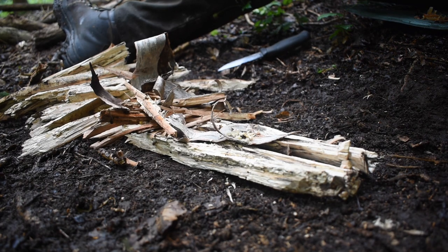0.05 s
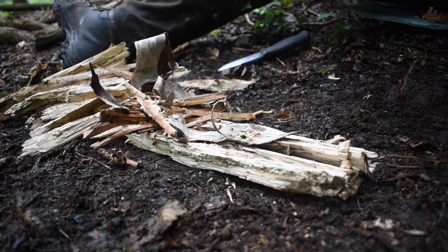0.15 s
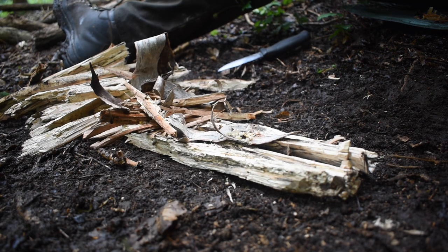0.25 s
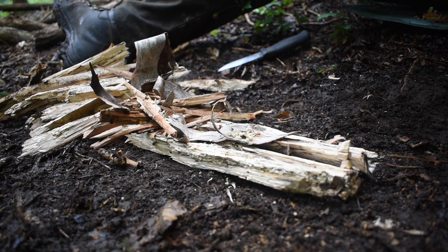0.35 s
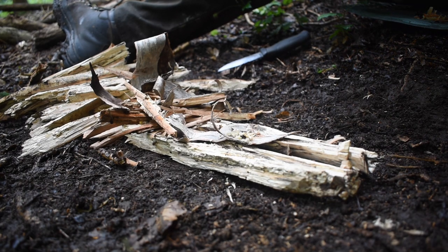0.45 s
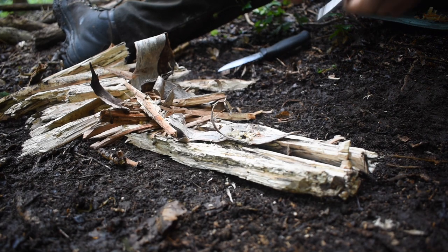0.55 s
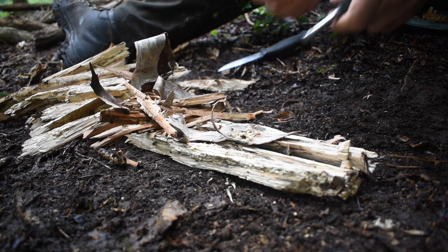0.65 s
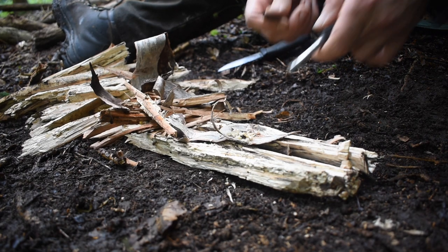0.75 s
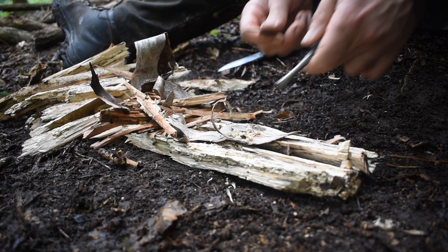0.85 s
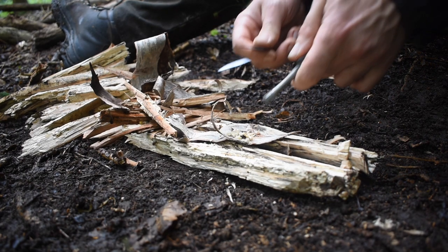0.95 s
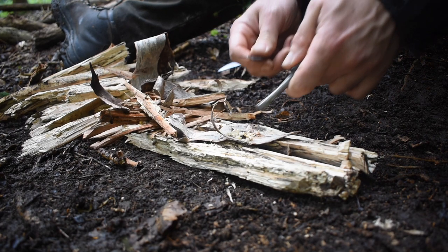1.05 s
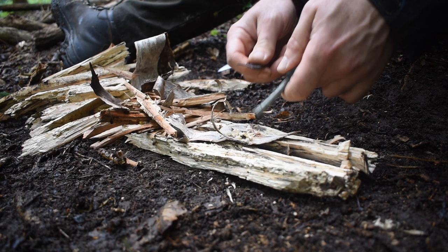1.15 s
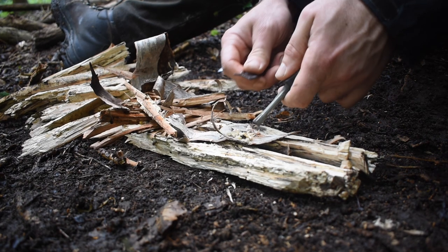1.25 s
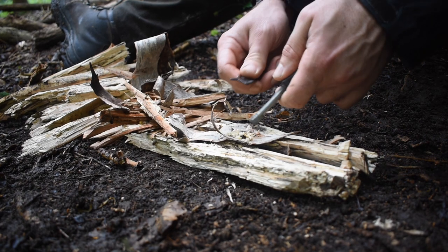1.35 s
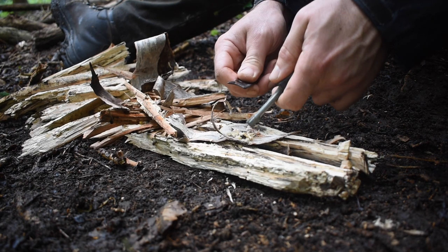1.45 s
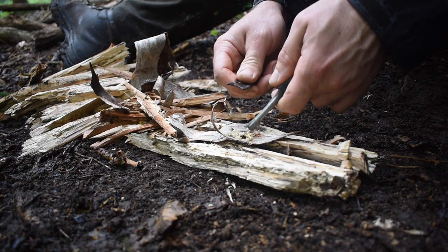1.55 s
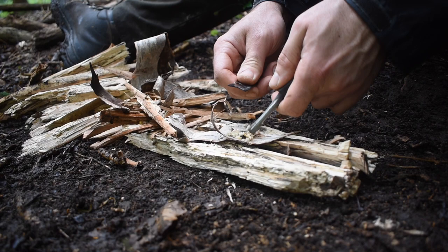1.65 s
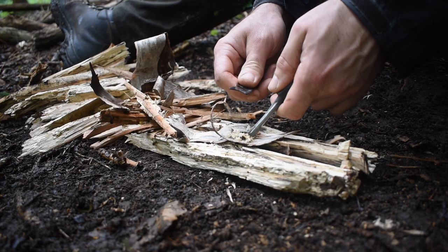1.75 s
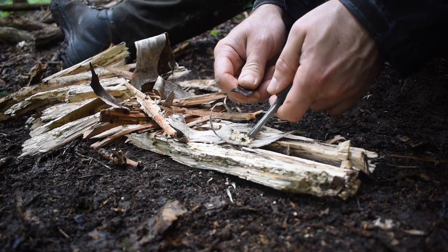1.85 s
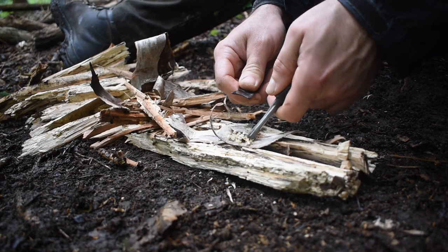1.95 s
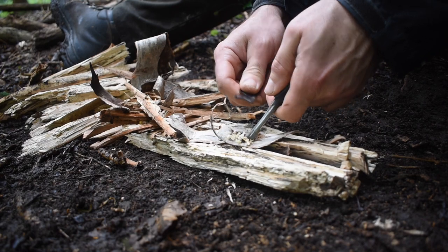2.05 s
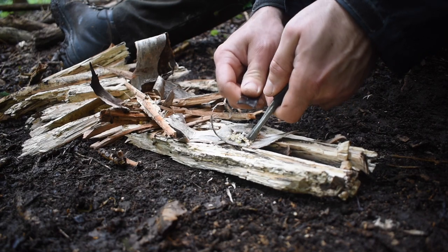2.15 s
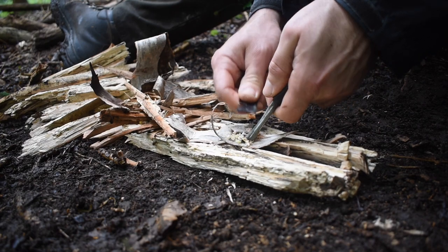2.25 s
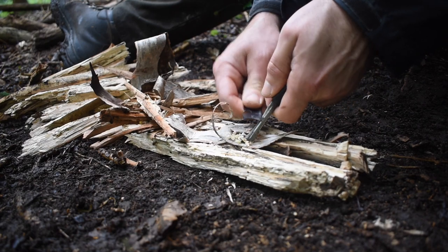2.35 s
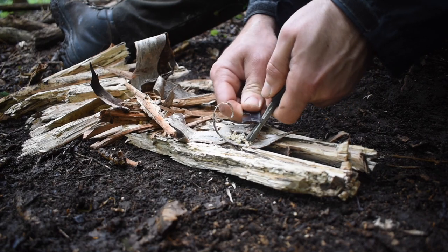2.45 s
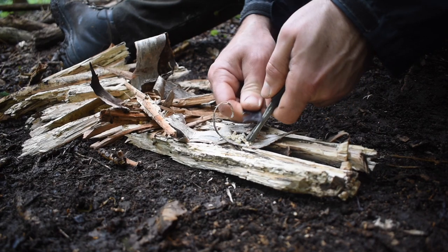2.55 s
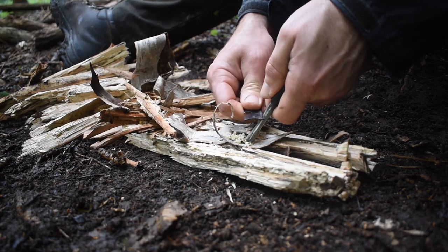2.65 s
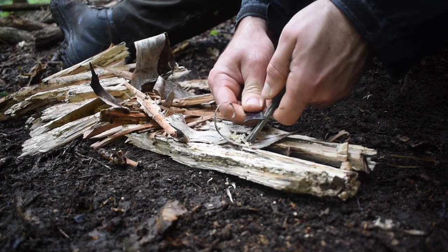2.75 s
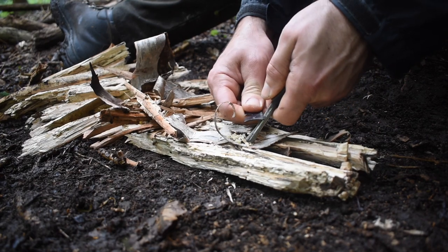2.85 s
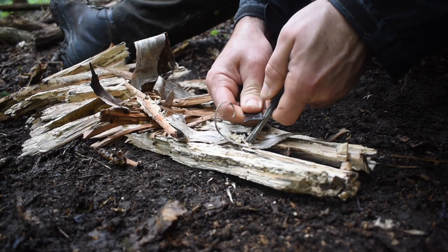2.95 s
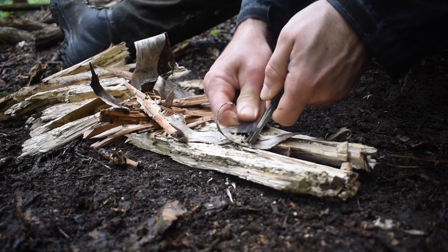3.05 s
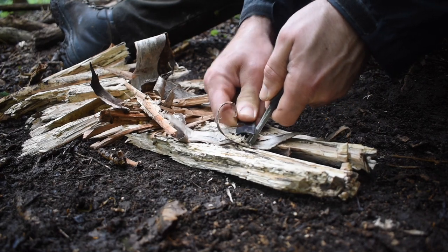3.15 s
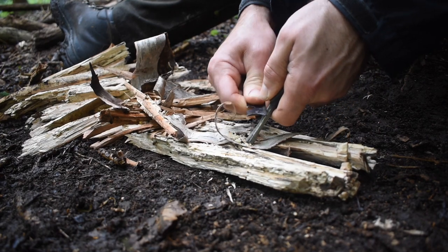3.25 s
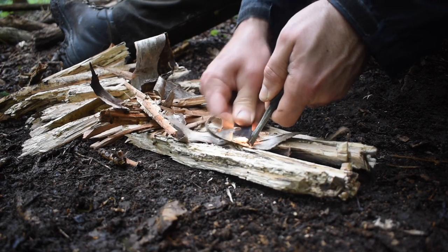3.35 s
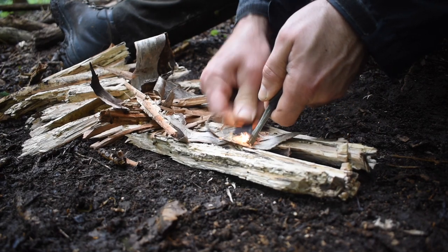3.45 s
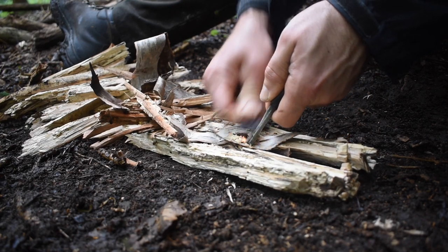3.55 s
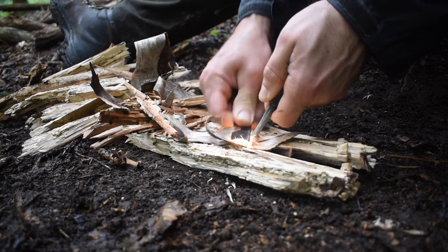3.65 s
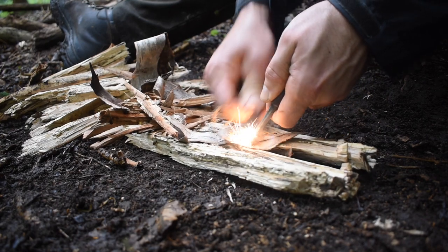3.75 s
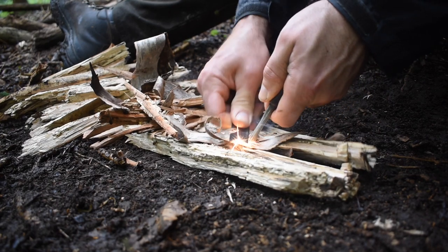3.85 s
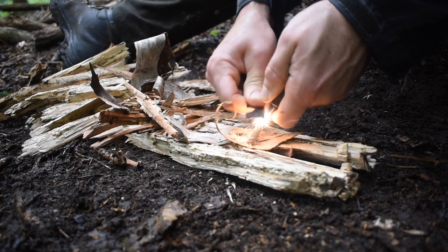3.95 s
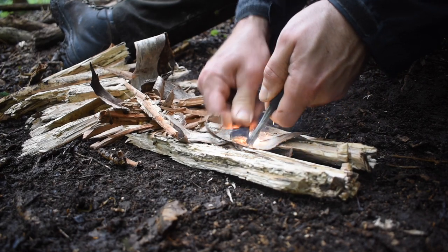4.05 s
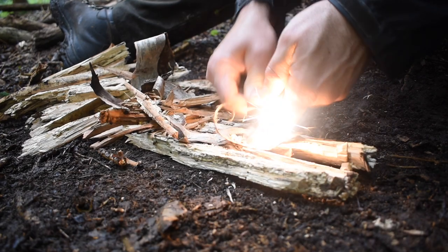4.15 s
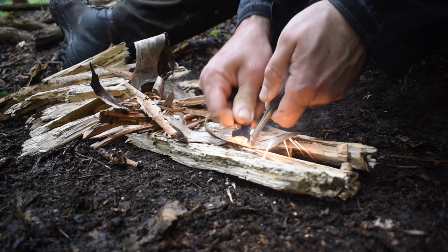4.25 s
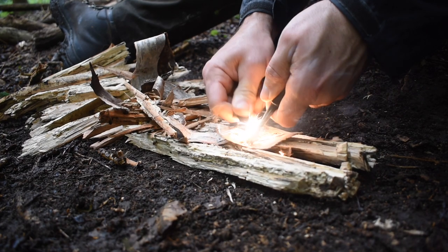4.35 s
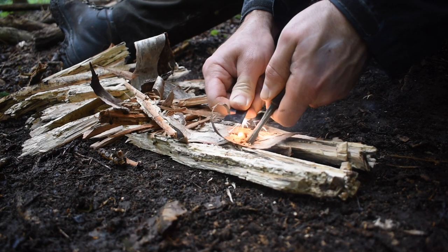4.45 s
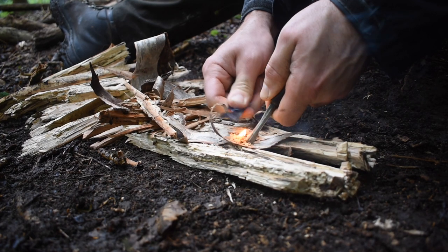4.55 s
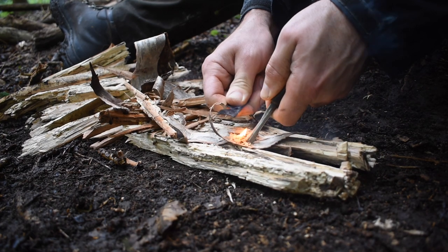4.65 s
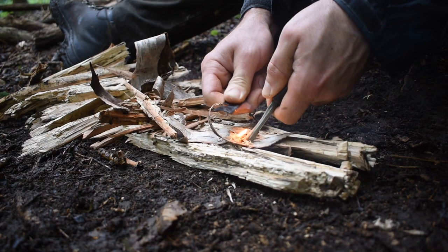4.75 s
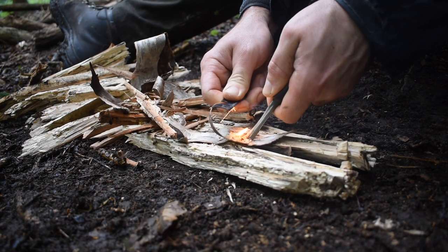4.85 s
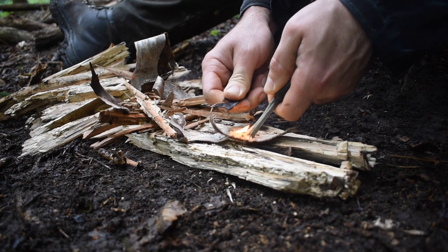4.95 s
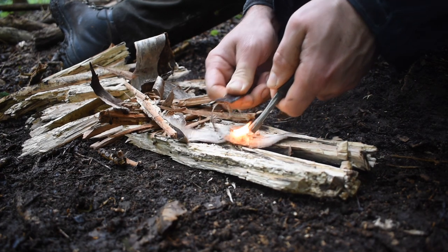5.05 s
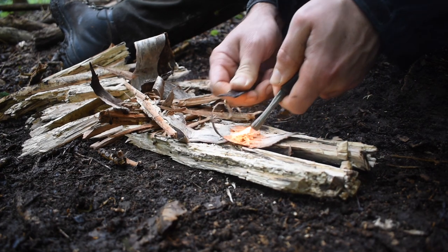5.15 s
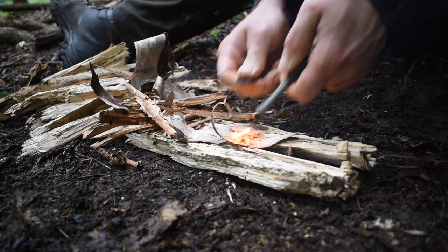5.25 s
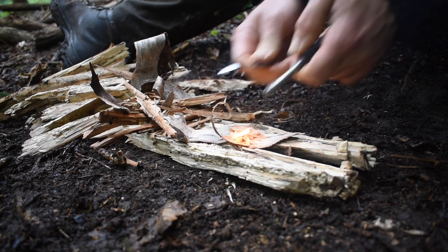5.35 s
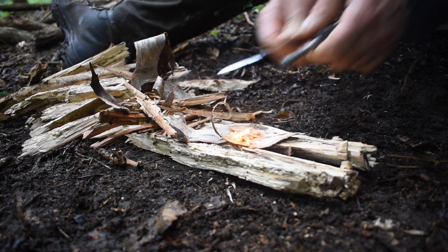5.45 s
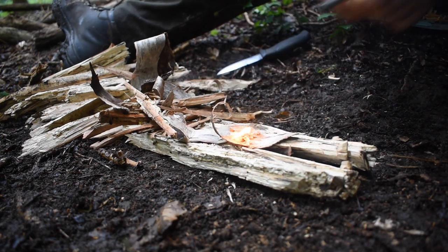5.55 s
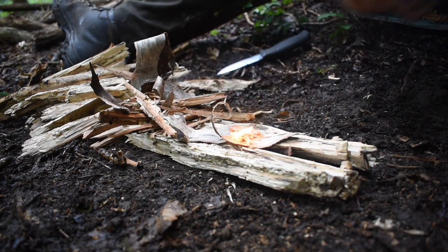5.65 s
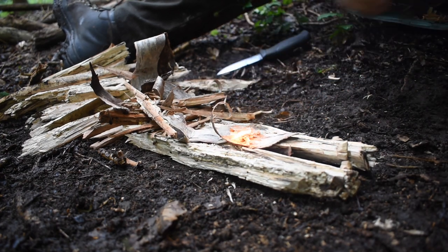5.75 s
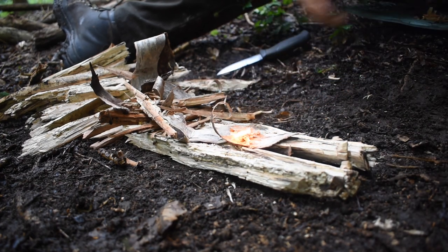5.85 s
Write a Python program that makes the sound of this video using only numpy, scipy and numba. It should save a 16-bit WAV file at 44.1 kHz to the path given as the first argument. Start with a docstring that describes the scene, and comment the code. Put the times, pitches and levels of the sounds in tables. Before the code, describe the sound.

Soft hush and faint birds, a knock on wood, then a rapid run of harsh metallic scrapes and snaps, ending with cloth rustle.

```python
"""A steel striker is scraped in quick strokes down a fire rod, its tip on split wood and bark, close to a camera
microphone in a woodland: uneven noise grains ring rod, striker and wood through moving band-passes.
Knocks are short pushes into wood and rod resonances; ticks and snags are brief noise bursts on the rod.
Sleeves rustle as the hands come and go (filtered grains), far birds whistle (narrow noise with an echo),
and a motor drones (a few sines) under the hush of the trees (shaped noise)."""
import sys
import numpy as np
from scipy import signal
from scipy.fft import rfft, irfft
from scipy.io import wavfile
from scipy.ndimage import uniform_filter1d
from numba import njit

SR = 44100
rng = np.random.default_rng(int(sys.argv[2]) if len(sys.argv) > 2 else 0)


def file_out(sig):
    """Save sig as 16-bit WAV at sys.argv[1]."""
    # one column per channel
    cols = np.atleast_2d(sig).T
    # limit, then scale
    lim = np.clip(cols, -1, 1)
    pcm = np.round(lim * 32767).astype(np.int16)
    wavfile.write(sys.argv[1], SR, pcm)


N = 261072

# resonances of the split wood under the rod tip: (centre [Hz], width [Hz], level [dB])
WOOD_MODES = [(970, 1210, 0), (1950, 460, -15), (260, 220, -13)]
# resonances of the fire rod, the lowest first: (centre [Hz], width [Hz], level [dB])
ROD_MODES = [(2320, 700, 2.5), (3400, 170, -11), (4640, 700, -15), (6370, 1350, 10.5), (7100, 700, 6),
             (8350, 420, 2)]


def undb(db):
    """Gain of a dB value."""
    return 10 ** (np.asarray(db) / 20)


def unit(x):
    """Scale to rms 1."""
    return x / np.sqrt(np.mean(x ** 2))


def unit_peak(x):
    """Scale to peak 1."""
    return x / np.abs(x).max()


@njit
def svf(x, hz, width):
    """State-variable band-pass, gain 1 at a centre that may move every sample."""
    y = np.empty(len(x))
    band_state, low_state = 0., 0.
    for i in range(len(x)):
        g = np.tan(np.pi * hz[i] / SR)
        damping = width / hz[i]
        v = (band_state + g * (x[i] - low_state)) / (1 + g * (g + damping))
        band_state = 2 * v - band_state
        low_state += 2 * g * v
        y[i] = damping * v
    return y


def band(x, hz, width):
    """Band-pass at a fixed or moving centre."""
    centre = np.clip(hz + np.zeros(len(x)), 20, 19000)
    return svf(x + 1e-18, centre, 1. * width)


def body(x, modes):
    """Sum of resonances with alternating sign."""
    return sum((-1) ** k * undb(db) * band(x, hz, width) for k, (hz, width, db) in enumerate(modes))


def column(table, index):
    """One column of a table as a curve over time."""
    rows = np.array(table)
    return np.interp(np.arange(N) / SR, rows[:, 0], rows[:, index])


def walk(rate):
    """Random levels held 1 / rate s and slewed twice; spread near 1."""
    hold = int(SR / rate)
    steps = np.repeat(rng.standard_normal(N // hold + 1), hold)
    slewed = uniform_filter1d(uniform_filter1d(steps, hold), hold)
    return 1.3 * slewed[:N]


def coloured(x, spectrum):
    """Shape a steady sound by (Hz, dB) points, then scale to rms 1."""
    hz, db = np.transpose(spectrum)
    f = np.arange(1, N // 2 + 2) * SR / N
    gain = undb(np.interp(np.log(f), np.log(hz), db))
    return unit(irfft(rfft(x) * gain, N))


def grit(spread_db, chatter_db, rate, count):
    """Dense micro-impacts of very uneven size, in bunches; count independent noises share the sizes."""
    size = undb(spread_db * rng.exponential(size=N) + chatter_db * walk(rate))
    return size * rng.standard_normal((count, N))


def add(out, s, x):
    """Mix a short sound in at time s."""
    i = int(s * SR)
    out[i:i + len(x)] += x[:N - i]


def shaded(x):
    """Hands and log hide the top of the handwork from the microphone, and small parts radiate no bass."""
    x = signal.sosfilt(signal.butter(3, 8600, fs=SR, output="sos"), x)
    return signal.sosfilt(signal.butter(2, 260, "high", fs=SR, output="sos"), x)


def trees():
    """Distant leaves and air: a smooth hush that swells a little."""
    # hush spectrum: (frequency [Hz], relative level [dB])
    hush_spectrum = [(15, -50), (25, -4), (48, -17.5), (101, -8), (140, -6), (199, -6.5), (246, -1.5),
                     (340, -0.5), (434, 1.5), (1540, 1), (1860, -0.5), (4760, -7), (6580, -15), (8160, -15),
                     (15600, -24.5)]
    level_db, swell_db, swells_per_s = -67.5, .6, 2.3
    swelling = undb(level_db + swell_db * walk(swells_per_s))
    return swelling * coloured(rng.standard_normal(N), hush_spectrum)


def engine():
    """A few thin low lines of a distant motor, fading in and out on the air."""
    # the far motor: (time [s], firing rate [Hz], level [dB])
    motor_course = [(.8, 49.5, -94), (1.8, 51, -87.5), (2.8, 53.2, -83.5), (3.5, 53.57, -98),
                    (4.6, 47.9, -85), (5.2, 49.7, -81.5), (5.9, 50.16, -84.5)]
    # its audible lines: (multiple of the firing rate, relative level [dB])
    motor_orders = [(3, -4.5), (4, -2.5), (5, -3.5), (10, 1.5), (11, -19)]
    phase = 2 * np.pi * np.cumsum(column(motor_course, index=1)) / SR
    lines = sum(undb(db + 2.3 * walk(2.88)) * np.sin(int(k) * phase) for k, db in motor_orders)
    return undb(column(motor_course, index=2)) * lines


def birds():
    """Far whistles arrive by many paths between the trunks, so each is a blurred, fluttering line."""
    # whistled notes: (start [s], length [s], first pitch [Hz], last pitch [Hz], level before fade and echo [dB])
    notes = [(0.284, .1, 1680, 1640, -71.5), (0.462, 0.12, 2950, 2850, -69.5),
             (0.554, 0.1, 2160, 1990, -66), (0.687, .05, 1940, 2110, -71), (0.727, 0.11, 2120, 2140, -71),
             (0.813, 0.08, 1986, 2300, -61), (0.906, 0.25, 2304, 2300, -67.5), (1.13, .27, 1755, 1740, -75),
             (1.27, 0.11, 2200, 2300, -74), (1.45, 0.089, 2240, 2200, -77), (1.43, 0.15, 4380, 4450, -79),
             (2.521, .2, 3550, 3760, -76), (4.6, .3, 1560, 1570, -74.5), (4.611, 0.29, 2280, 2350, -72),
             (4.646, 0.26, 1880, 1880, -78), (5.13, 0.085, 2530, 2500, -66),
             (5.151, 0.089, 2880, 2930, -66.5), (5.293, 0.24, 2914, 2940, -68.5),
             (5.32, .1, 2470, 2570, -64)]
    fade_db_per_s, echo_db, waver = 17, -1.5, .012  # waver is a fraction of the pitch
    out = np.zeros(N)
    for s, length, first_hz, last_hz, db in notes:
        t = np.arange(int(length * SR)) / SR
        glide_hz = first_hz + (last_hz - first_hz) * t / length
        hz = glide_hz * (1 + waver * walk(22.5)[:len(t)])
        noise = rng.standard_normal(N // 10)[:len(t)]
        blur = unit(band(band(noise, hz, 60), hz, 140))
        add(out, s, blur * undb(db - fade_db_per_s * t) * signal.windows.tukey(len(t), .25))
    t = np.arange(12000) / SR
    trunks = rng.standard_normal(len(t)) * np.exp(-t / 0.24)
    echo = signal.fftconvolve(out, trunks / np.linalg.norm(trunks))[:N]
    return out + undb(echo_db) * echo


def sleeves():
    """Stiff cloth rubbing: fine grain up high, a hollow swish from the folds."""
    # hands reach in, settle and draw back: (time [s], rustle level [dB], swish level [dB], swish centre [Hz])
    cloth_course = [(0.0, -66.5, -69, 1670), (0.2, -67.5, -70, 1870), (0.5, -63, -72, 1750),
                    (0.76, -63, -71.5, 1920), (0.88, -71.5, -70, 2010), (1.26, -74.5, -69, 1860),
                    (1.55, -74.5, -79, 1950), (1.9, -73.5, -70, 1860), (2.2, -71.5, -86, 1670),
                    (2.5, -72.5, -68.5, 1490), (2.75, -75, -88.5, 1370), (4.4, -72, -85, 1690),
                    (4.55, -74.5, -80, 1700), (5.18, -71, -72, 1650), (5.31, -67, -77, 1540),
                    (5.5, -63.5, -68.5, 1690), (5.6, -57.5, -69, 1590), (5.69, -57, -56.5, 1560),
                    (5.79, -53.5, -54.5, 1800), (5.92, -54.5, -63.5, 1720)]
    # rustle spectrum: (frequency [Hz], relative level [dB])
    cloth_spectrum = [(1470, -62), (2500, -4.5), (2880, -1.5), (4040, 0.5), (5300, 1.5), (6500, 3),
                      (7200, 0), (8680, -7.5), (15000, -33.5)]
    rub, fold = grit(1.6, 1.13, 60, count=2)
    swish_hz = column(cloth_course, index=3) * (1 + 0.047 * walk(20))
    swish = unit(band(band(fold, swish_hz, 680), swish_hz, 1900))
    rustle = coloured(rub, cloth_spectrum)
    return undb(column(cloth_course, index=1)) * rustle + undb(column(cloth_course, index=2)) * swish


def ticks():
    """A burst of about a millisecond in a broad resonance, with a short noisy ring of the rod."""
    # striker edge touching or snagging on the rod, tinder crackling; levels before shading:
    # (time [s], tick peak [dB], tick centre [Hz], rod ring relative to the tick [dB])
    touches = [(1.812, -46, 6300, -5), (2.3455, -44, 6420, -6), (2.391, -22, 6240, -5.5),
               (2.4674, -57, 4450, -11), (2.6574, -57, 3870, 5), (2.714, -38.5, 7100, -22),
               (2.863, -47.5, 7200, -11), (2.868, -53, 4500, -13), (2.928, -52.5, 6720, -14),
               (2.9867, -44.5, 4230, -15), (3.019, -47, 4900, -6), (3.217, -40, 5620, -10),
               (3.4082, -27.5, 7060, -17), (3.447, -30.5, 7360, -18), (3.4917, -24.5, 5370, -8),
               (3.5258, -30, 5850, -26), (3.5813, -34, 6000, -20), (3.622, -27, 7050, -11),
               (3.7416, -27, 5600, -24), (3.754, -27, 6830, -13), (3.7684, -39, 6840, -10),
               (3.9168, -26, 5000, -18), (3.937, -22.5, 7050, -34), (4.0015, -27, 7200, -11),
               (4.035, -24, 4770, -18), (4.12, -26, 4790, -3), (4.1412, -18.5, 6800, -3),
               (4.1633, -26, 6600, -16), (4.1792, -19.5, 6200, -32), (4.187, -21.5, 6320, -16),
               (4.2409, -21, 7300, -27), (4.2463, -18.5, 6000, -4), (4.2851, -32.5, 3350, -11),
               (4.3022, -34, 7380, -24), (4.313, -33, 6860, -16), (4.3312, -34, 3360, -14),
               (4.36, -26, 3970, -35), (4.3826, -24, 6950, -12), (4.4019, -38, 7040, -14),
               (4.4174, -46, 4020, -22), (4.4697, -39, 6350, -8), (4.4878, -35, 6290, -8),
               (4.5012, -29.5, 8700, -22), (4.5124, -45, 8350, -18), (4.568, -40, 7900, -16),
               (4.607, -48.5, 3460, -8), (4.707, -47, 6710, -7), (4.7938, -49, 3680, -16),
               (4.875, -40.5, 8200, -8), (4.89, -45, 6630, -14), (5.0546, -46, 6250, -13),
               (5.438, -46, 3570, -16), (5.556, -24.5, 6200, -2), (5.5776, -37.5, 5460, -15)]
    out, t = np.zeros(N), np.arange(3000) / SR
    for s, db, hz, ring_db in touches:
        noise = rng.standard_normal(len(t))
        burst = noise * np.exp(-t / 0.0013)
        tick = band(band(burst, hz, .5 * hz), hz, 0.49 * hz)
        tick = tick + undb(-2.5) * band(burst, 6570, 7200)
        ring = body(noise * np.exp(-t / 0.004), ROD_MODES)
        add(out, s, undb(db) * (unit_peak(tick) + undb(ring_db) * unit_peak(ring)))
    return shaded(out)


def knocks():
    """A short push rings the wood with a splinter rattle, and the rod cracks along with it."""
    # rod tip or knuckles on the wood, before shading:
    # (time [s], thud peak [dB], rod crack relative to the thud [dB])
    hits = [(0.784, -49, -2), (1.1, -50.5, -12), (1.6445, -22, -6), (2.177, -53, -15), (2.4108, -41.5, 1),
            (2.487, -47, 0.5), (2.51, -51, 4), (2.684, -54, -14), (2.794, -54, 5), (3.1125, -32, -27),
            (3.856, -30.5, -2), (4.832, -50, 2), (5.2636, -21.5, -10.5), (5.2693, -36, -17),
            (5.411, -38, -6), (5.722, -42.5, 0)]
    out, t = np.zeros(N), np.arange(4000) / SR
    push = -np.exp(-t / .0001)
    for s, db, bright_db in hits:
        rattle, crackle = rng.standard_normal((2, len(t)))
        thud = body(push + undb(-16.0) * rattle * np.exp(-t / 0.0069), WOOD_MODES)
        crack = body(push + undb(-22) * crackle * np.exp(-t / 0.01), ROD_MODES)
        add(out, s, undb(db) * (unit_peak(thud) + undb(bright_db) * unit_peak(crack)))
    return shaded(out)


def strokes():
    """Pressure of each stroke (rise, contact, lift-off) passed to rod, wood, striker and sparks, and the rod's ring."""
    # one row a stroke, levels before shading, ring and wood and striker shares at mid-contact:
    # (start [s], rise [s], contact [s], level after the rise [dB], level at lift-off [dB],
    # ring of the free rod [Hz], wood share [dB], striker share [dB], spark fizz share [dB])
    stroke_rows = [(2.577, .014, 0.031, -65, -64, 5840, 0.5, -18, -33),
                   (3.031, 0.058, 0.06, -42.5, -45.5, 6100, -7.5, -4.5, -26),
                   (3.104, 0.01, 0.01, -40, -55.5, 6240, 0, 3.5, -34),
                   (3.17, 0.018, 0.019, -51.5, -55.5, 5240, -8, -15, -30),
                   (3.212, 0.0094, 0.048, -51.5, -44, 5600, -7.5, -16, -42),
                   (3.282, .01, 0.011, -46, -50.5, 6300, -9, -10, -32),
                   (3.322, 0.02, 0.063, -44.5, -38.5, 5840, -10.5, -5, -16),
                   (3.401, 0.0047, 0.049, -42.5, -46.5, 6950, -3, -3, -24),
                   (3.46, 0.022, 0.066, -42.5, -48.5, 5600, -7, -31, -19),
                   (3.546, 0.066, 0.091, -42.5, -33.5, 6460, -8.5, -4.5, -19),
                   (3.64, 0.011, 0.075, -44.5, -50.5, 6750, -5.5, -8.5, -21),
                   (3.704, 0.014, 0.043, -42.5, -41, 5900, -3.5, -7.5, -23),
                   (3.755, .012, 0.034, -50.5, -48, 6800, -0.5, -8, -10),
                   (3.789, 0.014, .068, -42.5, -35, 6250, -7.5, -5, -17),
                   (3.863, 0.017, 0.036, -50, -51.5, 6860, -4, -20, -20),
                   (3.908, 0.011, 0.077, -37.5, -47, 6300, -5, -10, -19),
                   (3.99, 0.031, 0.085, -37.5, -38, 6740, -5.5, -5, -20),
                   (4.107, 0.01, 0.083, -39.5, -36.5, 5730, -6, -17, -30),
                   (4.195, 0.0098, .058, -43, -35, 6740, -7, -5, -18),
                   (4.267, 0.039, 0.073, -46.5, -55, 6900, -2, -7, -16),
                   (4.34, 0.016, 0.075, -45.5, -47, 7050, -2.5, -4.5, -23),
                   (4.427, .01, 0.094, -58, -59.5, 6600, -2.5, -26, -15.5)]
    lift_s = 0.033  # the edge comes off the rod
    climb_hz_per_s = 4300  # the free rod shortens as the edge travels, so its ring climbs
    # nearer the tip the wood speaks more, the striker less
    wood_gain_db_per_s, striker_fade_db_per_s = 19, 29
    # a tiny floor keeps the ring at 6000 Hz between strokes
    power, weighted_hz = np.full((4, N), 1e-18), np.full(N, 6e-15)
    for s, rise, contact, top_db, end_db, hz, wood_db, striker_db, fizz_db in stroke_rows:
        t = np.arange(int((contact + lift_s) * SR)) / SR
        # squared ramps up and down, with a hold between them
        grip = np.clip(np.minimum(t / rise, (contact + lift_s - t) / lift_s), 0, 1) ** 2
        level = grip * undb(np.interp(t, [min(rise, contact), contact], [top_db, end_db]))
        along = t - contact / 2  # seconds from mid-contact
        wood_share = wood_db + wood_gain_db_per_s * along
        striker_share = striker_db - striker_fade_db_per_s * along
        for row, db in zip(power, [0 * t, wood_share, striker_share, fizz_db + 0 * t]):
            add(row, s, (level * undb(db)) ** 2)
        add(weighted_hz, s, level ** 2 * (hz + climb_hz_per_s * along))
    # where strokes overlap, the stronger one pulls the ring towards its pitch
    return (*np.sqrt(power), weighted_hz / power[0])


def scraping():
    """Grit torn off the rod rings its free length, the striker plate and the wood; sparks fizz on top."""
    log_hz, striker_hz = 320, 4600
    rod_gain, wood_gain, striker_gain, fizz_gain, ring_hz = strokes()
    # the edge chatters, so the grit comes in bunches
    on_rod, on_edge, on_plate, on_wood = grit(2.92, 2.07, 260, count=4)
    ring = band(on_rod, ring_hz * (1 + 0.064 * walk(40)), 1300)
    ring = unit(band(ring, ring_hz, 6900))
    broad = undb(-3) * unit(band(on_edge, 6700, 5000))
    # the thumb shifts on the plate and detunes it
    plate_hz = striker_hz * (1 + 0.12 * walk(25.11))
    striker = unit(band(band(on_plate, plate_hz, 850), striker_hz, 2200))
    wood = unit(band(on_wood, 2260, 2900)) + undb(-16.5) * unit(body(on_wood, WOOD_MODES))
    sparks = grit(2.9, 7.1, 70, count=1)[0]
    fizz = unit(band(band(sparks, 11300, 4900), 13000, 7300))
    log = undb(-21.0) * unit(band(band(on_edge, log_hz, 350), log_hz, 810))
    # the rod's lowest ring joins the wood
    low_hz, low_width = ROD_MODES[0][0], ROD_MODES[0][1]
    low_ring = unit(band(band(on_rod, low_hz, low_width), low_hz, 2000))
    wood = unit(wood + undb(-12) * low_ring)

    def patchy(x):
        """Let a part speak up in patches as the grip shifts."""
        return x * undb(3.08 * walk(35))

    rod = unit(patchy(ring) + patchy(broad))
    handwork = rod_gain * rod + striker_gain * patchy(striker) + wood_gain * patchy(wood)
    return shaded(handwork) + fizz_gain * fizz + wood_gain * log


def scene():
    """Close handwork with a faint scatter from the ground and logs, over the woodland."""
    near = scraping() + knocks() + ticks()
    t = np.arange(4000) / SR
    ground = rng.standard_normal(len(t)) * np.exp(-t / 0.03)
    scatter = signal.fftconvolve(near, ground / np.linalg.norm(ground))[:N]
    near = near + undb(-18.5) * scatter
    return (near + birds() + sleeves() + engine() + trees())[None]


def record(dry):
    """The camera thins the bass below 40 Hz and cuts the top above 15.6 kHz."""
    thin = signal.sosfilt(signal.butter(1, 40, "high", fs=SR, output="sos"), dry)
    return signal.sosfilt(signal.ellip(10, .2, 70, 15600, fs=SR, output="sos"), thin)


dry = scene()
out = record(dry)
file_out(out)
```